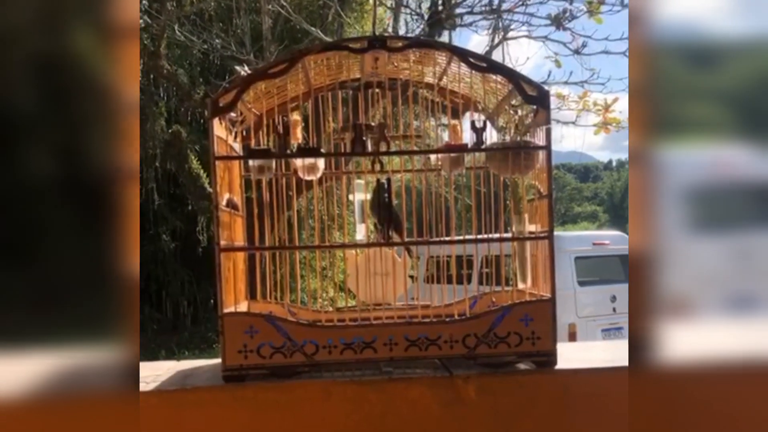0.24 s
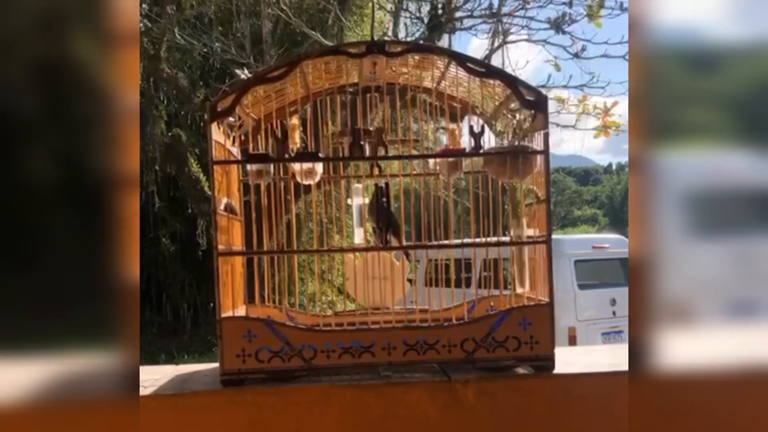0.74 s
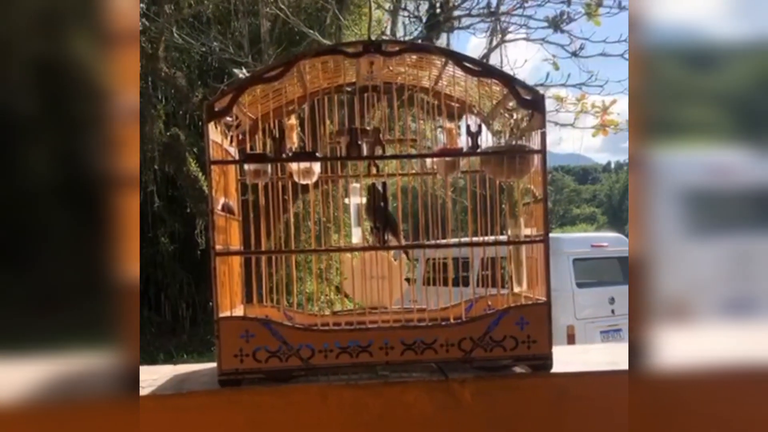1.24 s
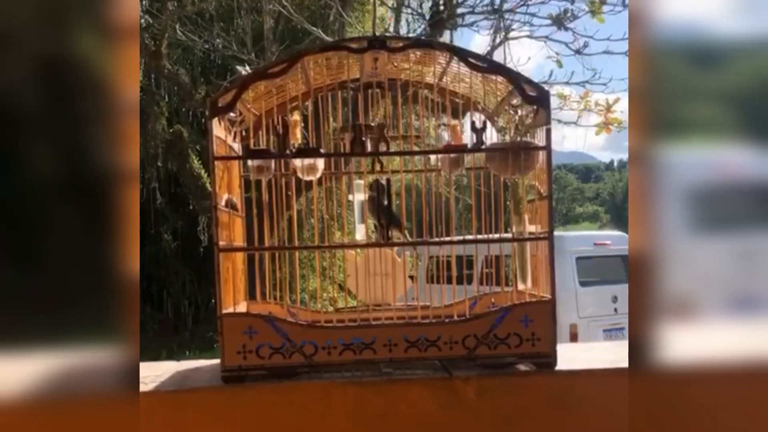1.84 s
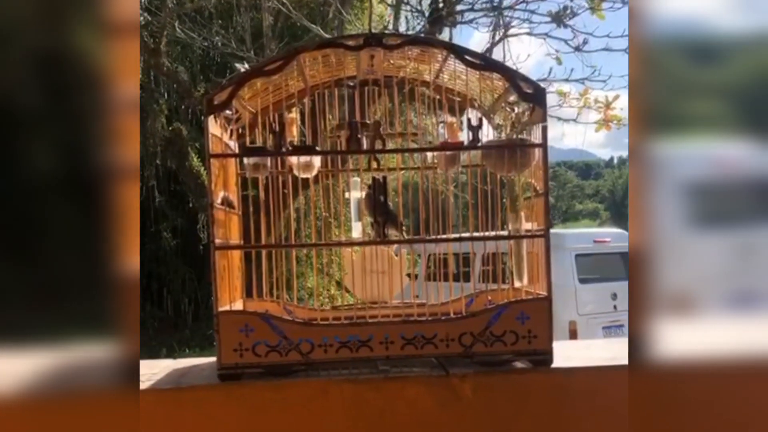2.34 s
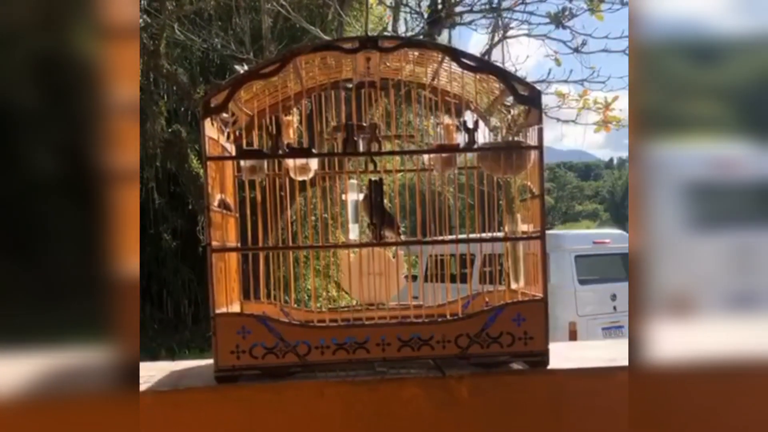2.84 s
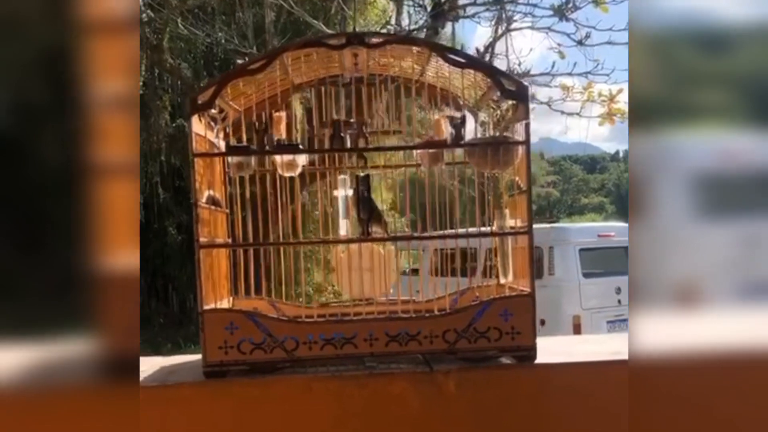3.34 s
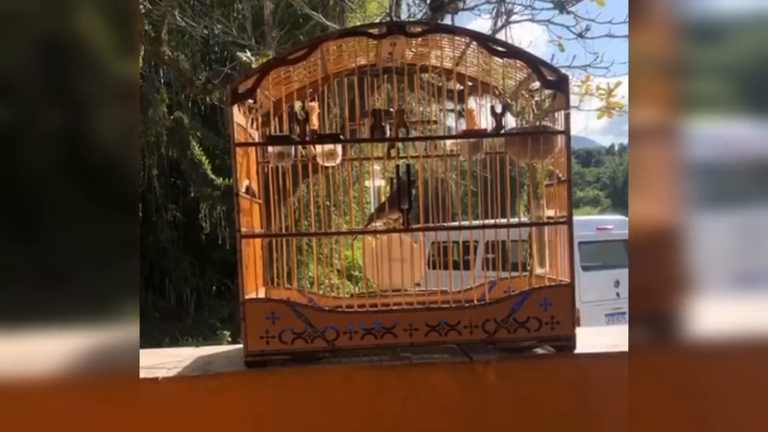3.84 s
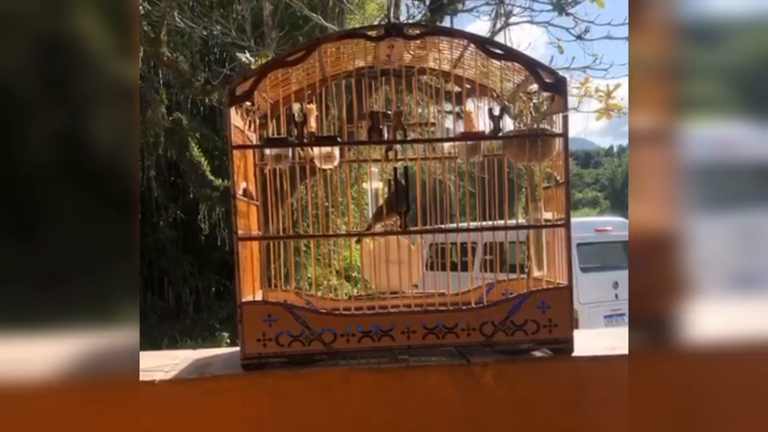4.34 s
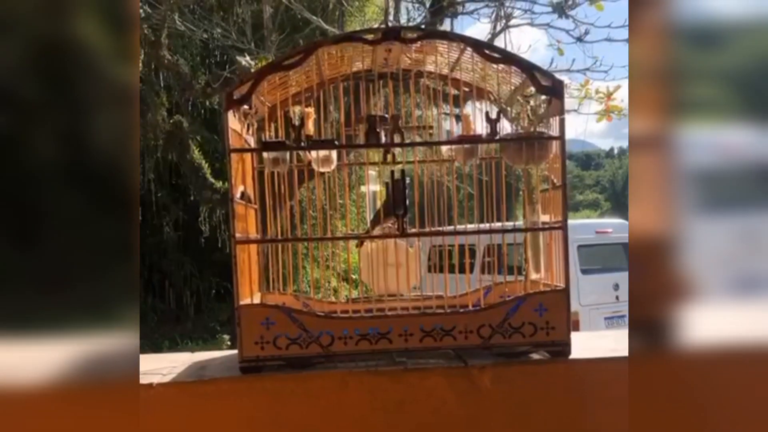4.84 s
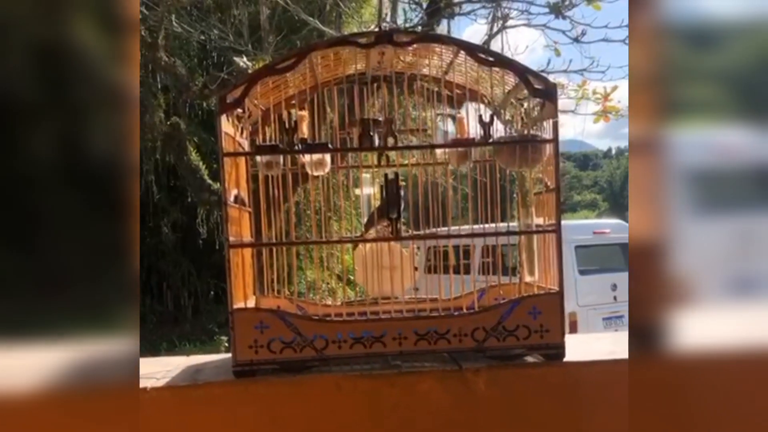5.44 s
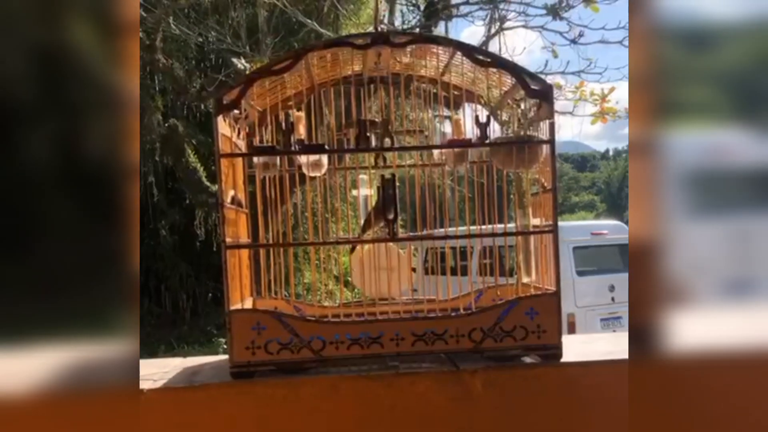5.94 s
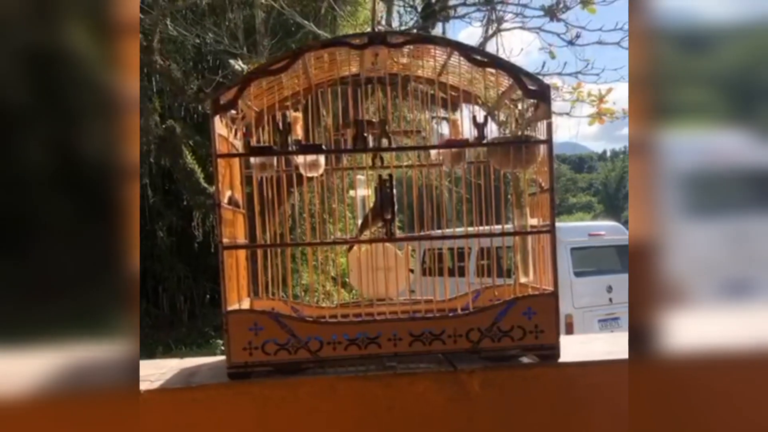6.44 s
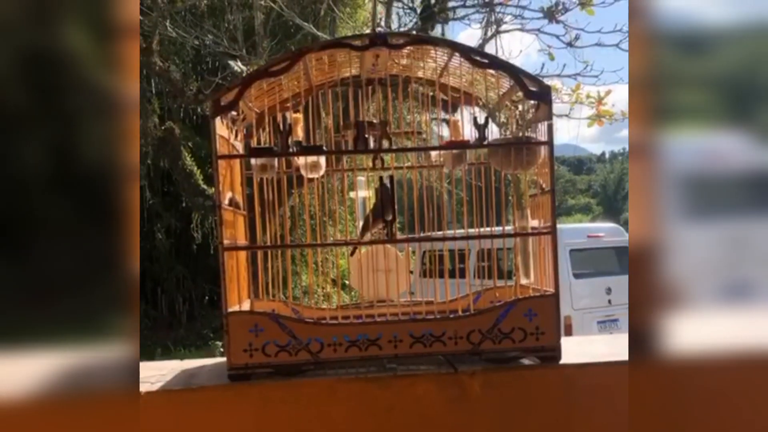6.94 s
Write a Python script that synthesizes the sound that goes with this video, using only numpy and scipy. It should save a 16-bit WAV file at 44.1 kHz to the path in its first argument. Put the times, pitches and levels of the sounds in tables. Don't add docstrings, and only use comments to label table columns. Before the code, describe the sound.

Quiet outdoor air with faint far birds, then a loud small bird sings warbled rising whistles and four sharp falling ones. Dull finger knocks on the phone end the first part, followed by a brief total silence. A distant engine revs low and fades; the bird sings again, adding a trill and rough warble before three weakening falls. Single close handheld microphone, dulled extreme treble, short porch reflections.

```python
import sys
import numpy as np
from scipy import signal
from scipy.fft import rfft, irfft
from scipy.io import wavfile
from scipy.ndimage import uniform_filter1d, map_coordinates

SR = 44100
rng = np.random.default_rng(int(sys.argv[2]) if len(sys.argv) > 2 else 0)


def voltage_ratio(decibels):
    exponent = np.asarray(decibels, float) / 20
    return 10 ** exponent


def wrap_up_sound(samples):
    columns = np.atleast_2d(samples).T
    tamed = np.clip(columns, -1, 1)
    steps = np.round(tamed * 32767).astype(np.int16)
    wavfile.write(sys.argv[1], SR, steps)


N = 316638

# length, turn (glide middle), ease (glide time scale), attack, release, scoop_s,
# wake and calm (warble start, fade) [s]; first_hz, last_hz, scoop, warble_hz, shake [Hz];
# creep [Hz/s]; swell_db [dB]
LIFT = dict(length=0.171, first_hz=2760, last_hz=3658, turn=.035, ease=0.016, creep=1900, attack=0.022, swell_db=9.5, release=.02, warble_hz=139.7, shake=157, calm=(.035, .09))
RISE = dict(length=0.17, first_hz=3030, last_hz=4399, turn=.095, ease=.028, scoop=150, attack=0.026, swell_db=12.5, release=0.0047, warble_hz=142.3, shake=272, calm=(.055, 0.095))
FALL = dict(length=0.084, first_hz=17200, last_hz=5402, turn=-0.016, ease=0.03, scoop=600, scoop_s=0.0012, attack=0.016, swell_db=6.5, release=.004)
BUZZ = dict(length=0.049, first_hz=6014, last_hz=4100, turn=0.031, ease=0.012, scoop=2000, scoop_s=.006, attack=0.0074, swell_db=-4, release=0.0089, warble_hz=110.83, shake=640, wake=.024, calm=(.036, .048))
DROP = dict(length=0.036, first_hz=3800, last_hz=2632, turn=.026, ease=.005, attack=0.0054, swell_db=1.5, release=0.0077)
TRILL = dict(length=.152, first_hz=6400, last_hz=4630, turn=.048, ease=.036, attack=0.012, swell_db=-0.5, release=.009, warble_hz=203.9, shake=570, calm=(0.0097, 0.11))
GLIDE = dict(length=0.12, first_hz=21400, last_hz=5633, turn=-0.046, ease=0.035, attack=0.019, swell_db=2, release=0.016)
RATTLE = dict(length=.082, first_hz=4304, last_hz=3510, turn=0.081, ease=0.015, scoop=270, scoop_s=0.015, attack=0.013, swell_db=7, release=.002, warble_hz=226, shake=340, calm=(0.029, 0.092))
HOOK = dict(length=0.042, first_hz=4210, last_hz=2770, turn=0.032, ease=0.0092, scoop=1700, scoop_s=.012, attack=0.0056, swell_db=-4.5, release=.007, warble_hz=205.6, shake=390, wake=0.022, calm=(.04, .05))
CHIP = dict(length=0.022, first_hz=7800, last_hz=7550, turn=0.0074, ease=.005, attack=0.0035, swell_db=6.5, release=0.0052, warble_hz=125.4, shake=650, calm=(.02, .03))
# (shape, [(time [s], level [dB], stretch [ratio])])
NOTES = [
    (LIFT, [(1.437, -31.5, 0.98), (4.565, -33.5, 0.96)]),
    (RISE, [(1.714, -21, 1.03), (1.966, -18.5, 1.045), (2.19, -18, 1.058), (4.852, -22, 1), (5.096, -19, 1), (5.326, -18, 1.007)]),
    (TRILL, [(5.542, -20, 0.87)]),
    (GLIDE, [(5.736, -17.5, 1)]),
    (RATTLE, [(5.894, -21.5, 1.0)]),
    (HOOK, [(5.976, -30, 0.97)]),
    (CHIP, [(4.479, -52, 0.79)]),
]
# (time [s], level [dB], stretch [ratio], wait for buzz [s])
CASCADES = [
    (2.42, -15, 0.92, 0.072),
    (2.617, -15.5, 1, .078),
    (2.829, -15, 0.92, 0.079),
    (3.042, -15.5, 0.92, 0.08),
    (6.057, -17.5, 0.91, 0.075),
    (6.258, -18.5, 0.89, .076),
    (6.491, -20.5, 0.85, 0.077),
]
# (multiple [ratio], level [dB])
OVERTONES = [(2, -30.5), (3, -39)]
# (frequency [Hz], gain [dB])
THROAT_GAIN = [(6000, 3), (7200, -6.5), (8500, 1.5), (10500, 2), (11800, 0), (12400, -19.5), (14000, -44.5)]
# (frequency [Hz], gain [dB])
BEAK_GAIN = [(2700, -6), (3300, -1.67), (4000, 1.1), (5000, -0.5), (6000, 0.2), (7500, -0.5), (9200, -3.8)]
# (frequency [Hz], t60 [s])
CAGE_T60 = [(2000, .06), (11000, .05)]
# (frequency [Hz], t60 [s])
PORCH_T60 = [(2000, 0.15), (4000, 0.28), (7000, 0.22), (11000, 0.31)]
# (time [s], level [dB])
TICK = (5.4, -44)
# (time [s], peak level [dB], first pitch [Hz], t60 [s])
BUMPS = [(2, -35, 400, 0.52), (2.129, -43.5, 301, 0.15), (2.168, -48, 505, 0.086), (2.227, -38, 600, 0.34),
         (3.207, -33.5, 790, 0.14), (3.222, -26.5, 693, 0.17), (3.359, -42, 1300, 0.18),
         (3.4073, -22.5, 3190, 0.039), (3.413, -23.5, 104.9, .14), (6.126, -42, 833, 0.034),
         (6.276, -30, 610, 0.011)]
# (start [s], end [s], level [dB])
SCUFF = (3.365, 3.43, -44)
# (time [s], length [s], first pitch [Hz], last pitch [Hz], level [dB])
FAR_WHISTLES = [
    (0.237, 0.16, 2056, 2085, -63.5),
    (0.509, 0.14, 2134, 2070, -64),
    (1.0, 0.13, 1950, 1800, -69.5),
    (6.375, 0.19, 2580, 2046, -63.5),
    (6.72, 0.14, 1695, 2374, -62),
    (6.917, 0.2, 3210, 2166, -58),
]
# (time [s], firing rate [Hz], level [dB])
ENGINE = [
    (3.72, 40, -52.5),
    (3.9, 42, -35.5),
    (4.2, 47, -42.5),
    (4.55, 54, -46),
    (4.9, 56, -63.5),
    (5.1, 56, -70),
]
# (frequency [Hz], level [dB])
MAINS = [(240, -75), (260, -72.5), (360, -75.5), (420, -77), (480, -76), (540, -77.5)]
# (time [s], length [s], frequency [Hz], level [dB])
MOANS = [
    (2.38, 0.15, 135.9, -59),
    (2.98, 0.15, 129, -58),
    (5.09, .2, 167.4, -56.5),
    (6.96, .2, 169, -58.5),
]
# (frequency [Hz], density [dB/Hz])
INSECT_SPECTRUM = [(4500, -60), (5000, -16), (5110, 0), (5200, -5), (5350, -16), (5900, -60)]
# (frequency [Hz], density [dB/Hz])
LEAF_SPECTRUM = [(1350, -39), (2300, -11), (4050, -8.5), (4520, -9), (4930, -4), (5150, -9.5), (5910, -8),
                 (6300, -8.5), (7840, -18), (8860, -15), (10600, -24), (12300, -29.5), (13000, -41.5)]
# (frequency [Hz], density [dB/Hz])
TRAFFIC_SPECTRUM = [(47, -29), (80, 3.5), (211, -4), (364, -7.5), (444, -10), (479, -11.5), (1430, -21.5),
                    (2120, -24), (3000, -32), (3900, -72), (6600, -120)]
# (frequency [Hz], density [dB/Hz])
BREEZE_SPECTRUM = [(12, -40), (24, -14), (34, -9), (43, -2), (49, 0), (57, -4), (70, -12), (90, -22),
                   (130, -45), (240, -120)]
# (middle [s], half length [s], swell [dB])
GUSTS = [
    (.0, 0.04, 1),
    (.95, 0.058, -3),
    (1.95, .2, 3.5),
    (3.35, 0.16, 3.5),
    (4.0, 0.31, 1.5),
    (7.03, 0.023, 4),
]
# (frequency [Hz], gain [dB])
MIC_GAIN = [(9000, 1.5), (11000, 2.5), (12000, -7.5), (12600, -16), (13200, -34.5)]
# (start [s], end [s])
GAP = (3.556, 3.712)


def seedeater():
    buzz_db, drop_db, drop_after_s = -18, -26, 0.047
    fatigue_share = 0.25
    notes = [(shape, *row) for shape, rows in NOTES for row in rows]
    for s, db, stretch, wait_s in CASCADES:
        tired_db = fatigue_share * (db - CASCADES[0][1])
        notes.append((FALL, s, db, stretch))
        notes.append((BUZZ, s + wait_s, buzz_db + tired_db, 1))
        notes.append((DROP, s + wait_s + drop_after_s, drop_db + tired_db, 1))
    track = np.zeros(N)
    for shape, s, db, stretch in notes:
        note = voltage_ratio(db) * syllable(shape, stretch)
        add(track, voltage_ratio(-5) * note, s)
        add(track, voltage_ratio(-6) * echoes(note, CAGE_T60, first_s=0.001, seconds=0.1), s)
        add(track, voltage_ratio(-6) * echoes(note, PORCH_T60, first_s=0.002), s)
    return track


def syllable(shape, stretch, press=0.9, flutter_db=4.5):
    t = np.arange(round(shape["length"] * stretch * SR)) / SR

    def shiver():
        return np.interp(t, np.arange(90) * 0.0024, rng.standard_normal(90))

    hz, swell_db, depth_hz = contour(t / stretch, **shape)
    warble_hz = shape.get("warble_hz", 0) * (1 + 0.13 * shiver())
    warble = np.cos(2 * np.pi * np.cumsum(warble_hz) / SR)
    pitch_hz = rng.normal(1, 0.004) * hz + 25 * shiver() - depth_hz * warble
    phase = 2 * np.pi * np.cumsum(pitch_hz) / SR
    tone = voltage_ratio(swell_db + along(BEAK_GAIN, pitch_hz) + 1.5 * shiver()) * np.sin(phase)
    for k, db in OVERTONES:
        over_db = db + along(THROAT_GAIN, k * pitch_hz) + press * swell_db + flutter_db * shiver()
        tone += voltage_ratio(over_db) * np.sin(k * phase + 0.7 * shiver())
    return tone * np.clip(np.minimum(t, t[-1] - t) / 0.002, 0, 1) ** 2


def contour(t, length, first_hz, last_hz, turn, ease, attack, swell_db, release, scoop=0,
            scoop_s=0.0048, creep=0, shake=0, wake=0.001, calm=(1, 2), **_):
    glide_hz = first_hz + (last_hz - first_hz) / (1 + np.exp((turn - t) / ease))
    hz = glide_hz + creep * t - scoop * np.exp(-t / scoop_s)
    edges = (1 - np.exp(-(t / attack) ** 2)) ** 0.5 * np.clip((length - t) / release, 0, 1)
    db = 20 * np.log10(edges + 0.02) - swell_db * (1 - t / length) + min(swell_db, 0)
    depth_hz = shake * np.clip(t / wake, 0, 1) ** 2 * np.interp(t, np.sort(calm), [1, 0])
    return hz, db, depth_hz


def echoes(x, decays, first_s, seconds=1.0):
    hz, t, z = signal.stft(rng.standard_normal(round(seconds * SR)), SR, nperseg=128)
    decay = voltage_ratio(-60 * t / along(decays, hz)[:, None])
    tail = signal.istft(z * decay, SR, nperseg=128)[1]
    tail *= 1 - np.exp(-np.arange(len(tail)) / SR / first_s)
    return signal.fftconvolve(x, tail / np.linalg.norm(tail))


def along(points, hz):
    f, v = np.transpose(points)
    return np.interp(np.log(hz + 1), np.log(f + 1), v)


def add(track, x, s):
    part = track[round(s * SR):][:len(x)]
    part += x[:len(part)]


def unit(x):
    return x / np.sqrt(np.mean(x ** 2) + 1e-20)


def tick():
    s, db = TICK
    track, t = np.zeros(N), np.arange(round(0.008 * SR)) / SR
    bright = np.diff(rng.standard_normal(len(t) + 4), 4)
    add(track, voltage_ratio(db) * unit(bright * np.sin(np.pi * t / t[-1]) ** 0.5), s)
    return track


def fingers():
    case_hz, turns = 40, 0.88
    track, t = np.zeros(N), np.arange(SR // 4) / SR
    for s, db, first_hz, t60_s in BUMPS:
        cycles = case_hz * t + turns * np.log(1 + first_hz * t / turns)
        press = np.clip(t * first_hz / 1.3, 0, 1) ** 2
        add(track, -voltage_ratio(db - 60 * t / t60_s) * press * np.sin(2 * np.pi * cycles), s)
    start_s, end_s, db = SCUFF
    u = np.linspace(0, 1, round((end_s - start_s) * SR))
    band = signal.butter(3, [200, 1200], "band", fs=SR, output="sos")
    rub = unit(signal.sosfilt(band, rng.standard_normal(len(u))))
    add(track, voltage_ratio(db) * np.sin(np.pi * u ** 1.23) ** 2 * rub, start_s)
    return track


def far_birds():
    track = np.zeros(N)
    for s, length_s, first_hz, last_hz, db in FAR_WHISTLES:
        octaves = abs(np.log2(last_hz / first_hz))
        t60_s = 0.22 + 0.6 * octaves
        u = np.linspace(0, 1, round(length_s * SR))
        pitch_hz = last_hz + (first_hz - last_hz) * (1 - u) ** 1.25
        tone = np.sin(2 * np.pi * np.cumsum(pitch_hz) / SR)
        note = voltage_ratio(db) * tone * np.sin(np.pi * u ** 0.9)
        add(track, voltage_ratio(-3 - 9.2 * octaves) * note, s)
        add(track, voltage_ratio(-1.5) * echoes(note, [(2000, t60_s)], first_s=0.02), s)
    return track


def machines():
    t = np.arange(N) / SR
    s, hz, db = np.transpose(ENGINE)
    engine_db = np.interp(t, s, db, -120, -120) + 2.5 * wobble(8)
    engine_hz = np.interp(t, s, hz) + 1.5 * wobble(15)
    track = voltage_ratio(engine_db) * np.sin(2 * np.pi * np.cumsum(engine_hz) / SR)
    for hz, db in MAINS:
        track += voltage_ratio(db + 2.6 * wobble(5.9)) * np.sin(2 * np.pi * hz * t + 1.2 * wobble(2.6))
    for s, length_s, hz, db in MOANS:
        u = np.arange(round(length_s * SR)) / SR
        moan = np.sin(2 * np.pi * hz * u) + voltage_ratio(-1) * np.sin(4 * np.pi * hz * u)
        add(track, voltage_ratio(db) * np.sin(np.pi * u / length_s) * moan, s)
    return track


def wobble(rate_hz):
    knots = rng.standard_normal(int(N * rate_hz / SR) + 4)
    return map_coordinates(knots, [np.arange(N) * rate_hz / SR])


def insects():
    return voltage_ratio(-79.5 + 1.9 * wobble(2.6)) * rush(INSECT_SPECTRUM, patchy_db=5)


def leaves():
    return voltage_ratio(-71.93 + 0.24 * wobble(0.98)) * rush(LEAF_SPECTRUM, patchy_db=3)


def traffic():
    t = np.arange(N) / SR
    dip_db = -4.5 * np.exp(-((t - 3.7) / 0.1) ** 2)
    level_db = -61 + dip_db + 0.2237 * t + 0.88 * wobble(26)
    return voltage_ratio(level_db) * rush(TRAFFIC_SPECTRUM, patchy_db=2.5)


def breeze():
    t = np.arange(N) / SR
    gusts_db = sum(db * np.exp(-((t - s) / half_s) ** 2) for s, half_s, db in GUSTS)
    return voltage_ratio(-51.5 + gusts_db + 1.5 * wobble(6.7)) * rush(BREEZE_SPECTRUM, patchy_db=-0.5)


def rush(spectrum, patchy_db):
    hz, _, z = signal.stft(rng.standard_normal(N + 2048), SR, nperseg=2048)
    field = uniform_filter1d(rng.standard_normal(z.shape), size=5, axis=0)
    field = unit(uniform_filter1d(field, size=3, axis=1))
    z = z * voltage_ratio(patchy_db * field + along(spectrum, hz)[:, None])
    return unit(signal.istft(z, SR, nperseg=2048)[1][:N])


def scene():
    near = seedeater() + tick() + fingers()
    far = far_birds() + machines() + insects() + leaves() + traffic() + breeze()
    return (near + far)[None]


def masked(x, under_db=32, slope_db_per_khz=10.0):
    hz, _, z = signal.stft(x, SR, nperseg=1024)
    khz = hz[:, None] / 1000
    slope_db = slope_db_per_khz * khz
    level_db = 10 * np.log10(uniform_filter1d(np.abs(z) ** 2, size=7, axis=0) + 1e-20)
    shadow_db = np.maximum.accumulate(level_db + slope_db, axis=0) - slope_db - under_db
    keep = (level_db > shadow_db) | (khz < 4.4)
    return signal.istft(z * keep, SR, nperseg=1024)[1][:N]


def roll_off(x):
    return signal.sosfilt(signal.butter(12, 13170, fs=SR, output="sos"), x)


def record(dry):
    t = np.arange(N) / SR
    heard = irfft(rfft(dry) * voltage_ratio(along(MIC_GAIN, np.fft.rfftfreq(N, 1 / SR))), N)
    heard = heard / (1 + np.abs(heard / 0.6) ** 4) ** 0.25
    stop_s, start_s = GAP
    gate = np.clip((stop_s - t) / 0.002, 0, 1) + np.clip((t - start_s) / 0.021, 0, 1)
    return roll_off(masked(heard[0])[None] * gate)


dry = scene()
out = record(dry)
wrap_up_sound(out)
```